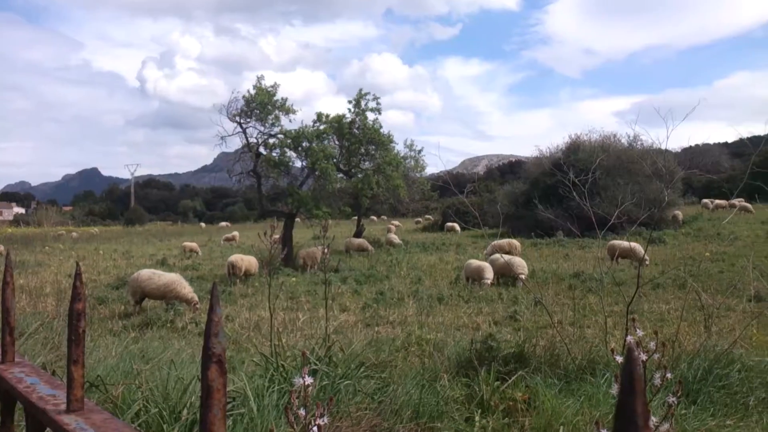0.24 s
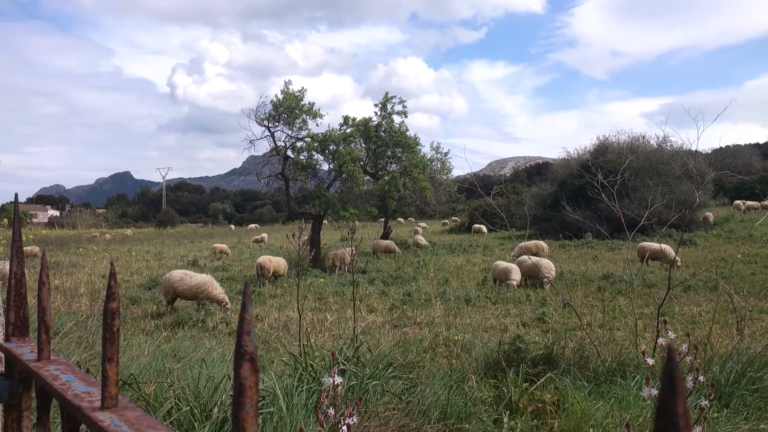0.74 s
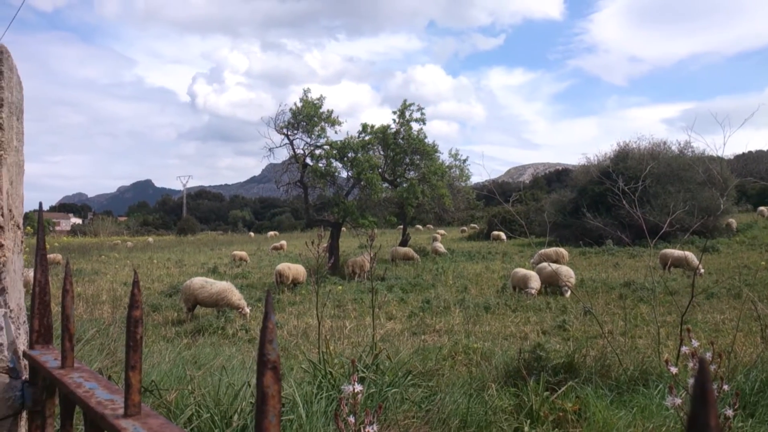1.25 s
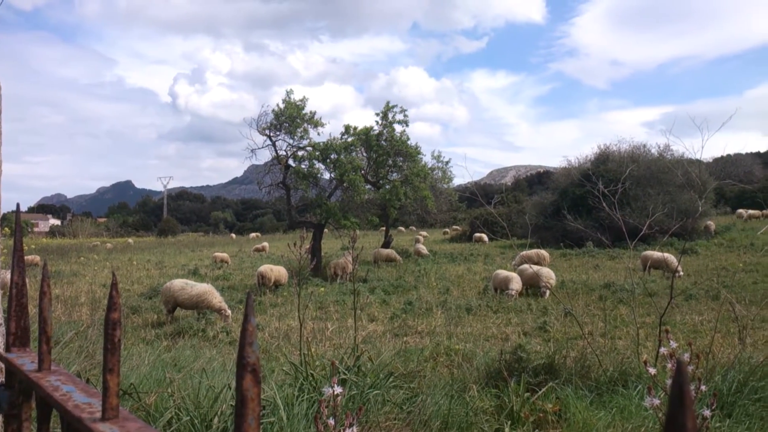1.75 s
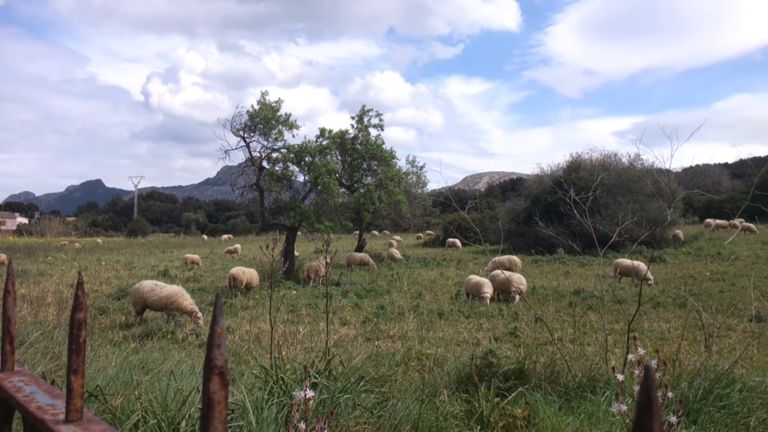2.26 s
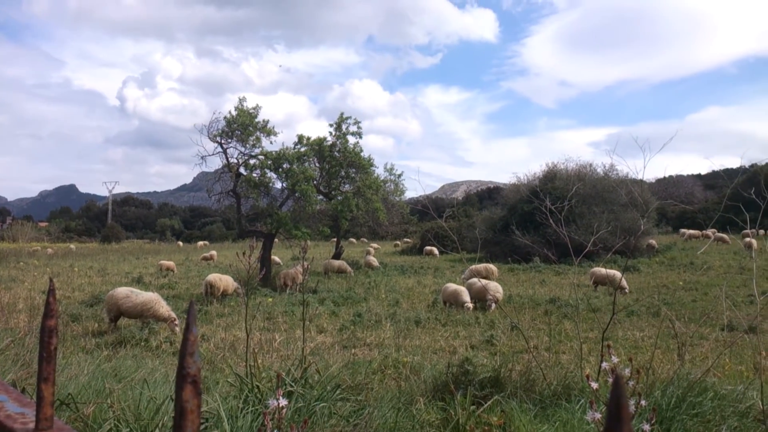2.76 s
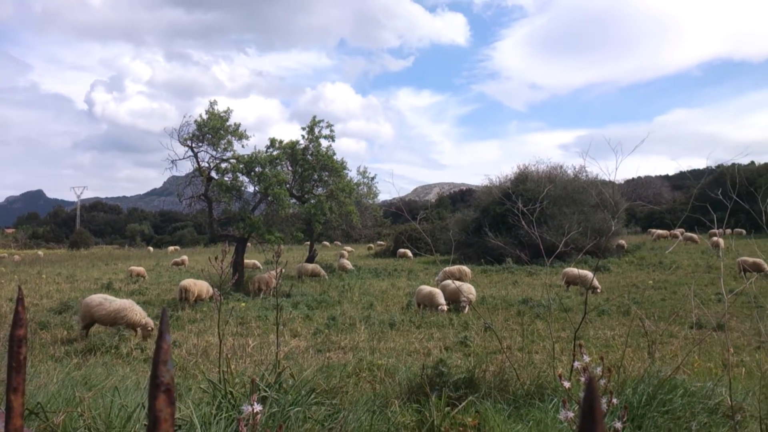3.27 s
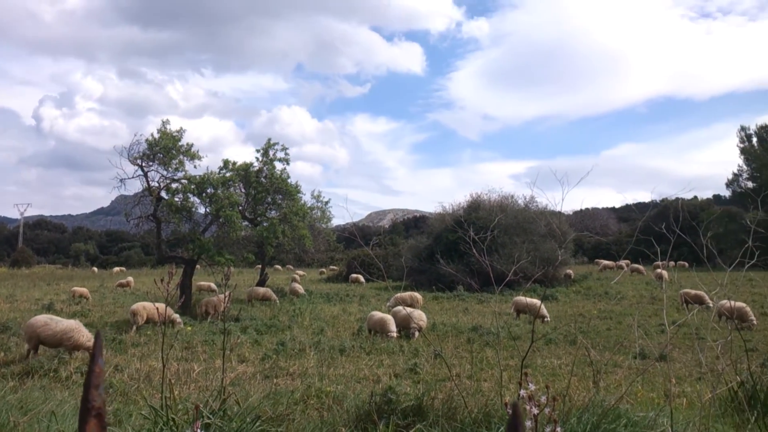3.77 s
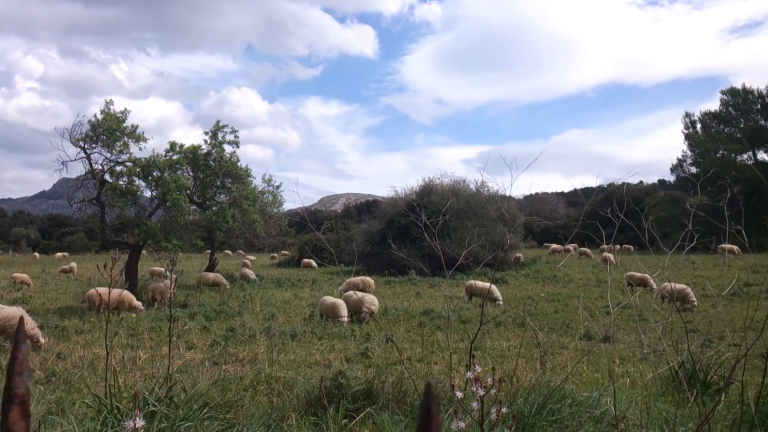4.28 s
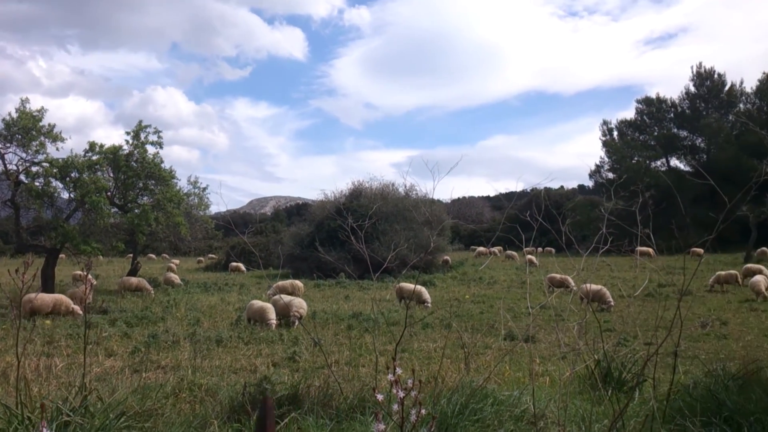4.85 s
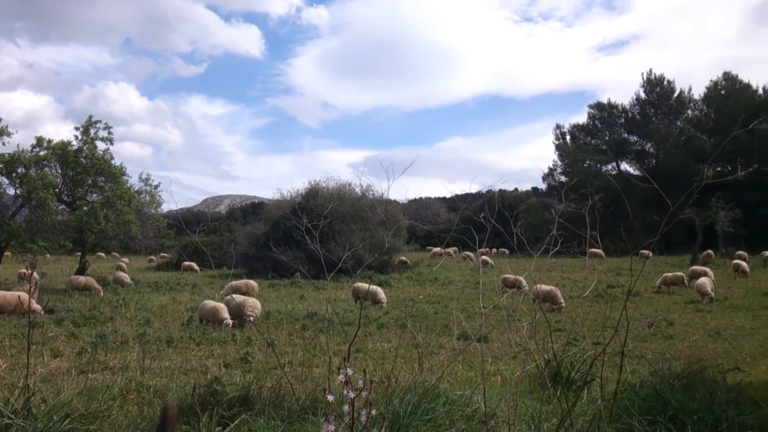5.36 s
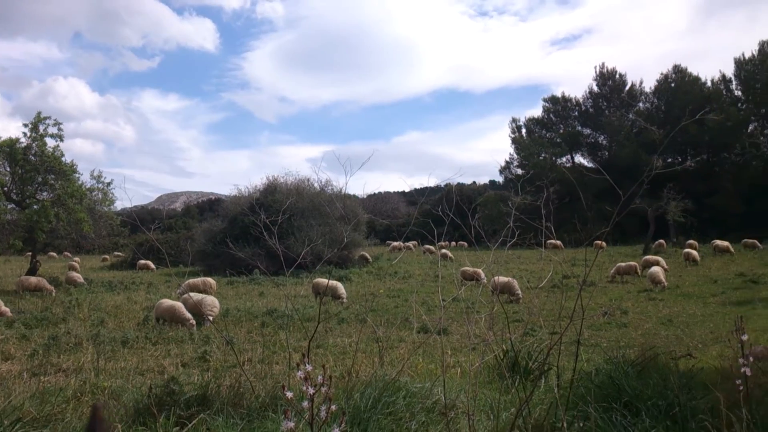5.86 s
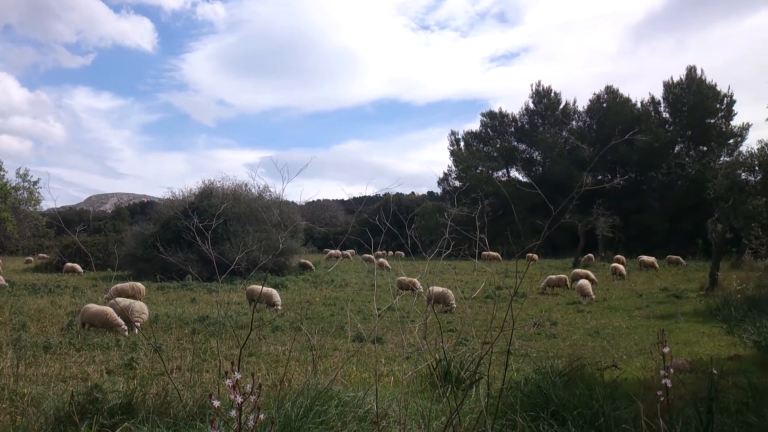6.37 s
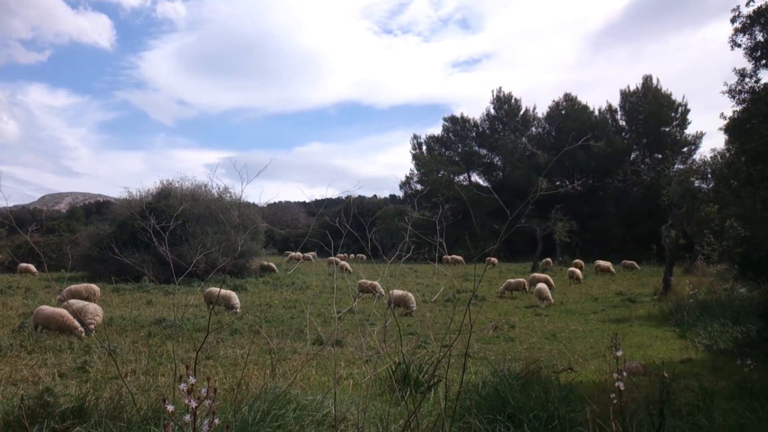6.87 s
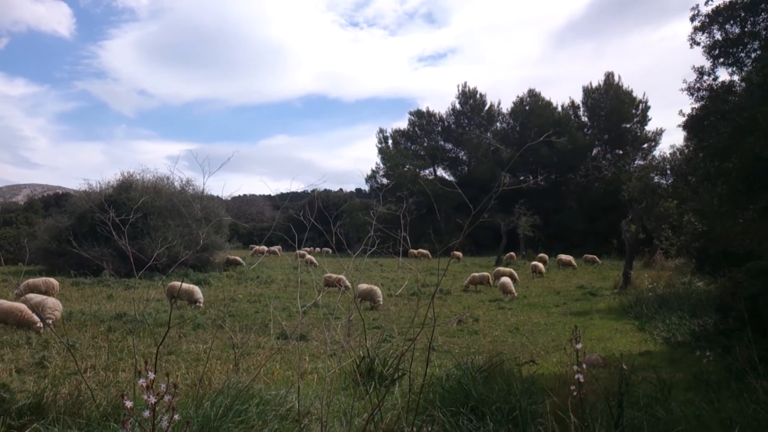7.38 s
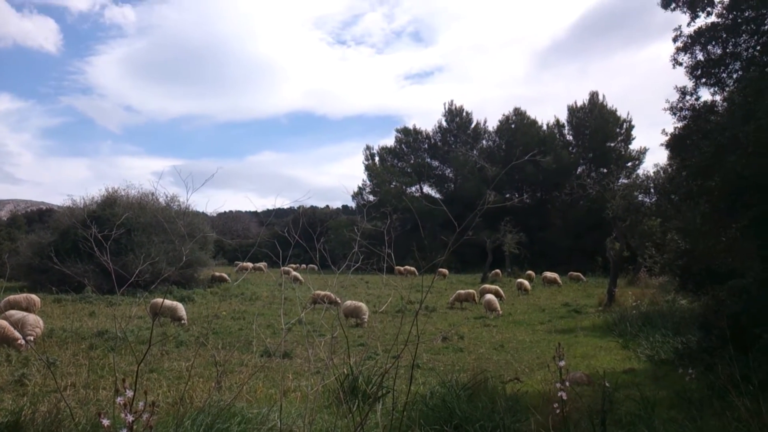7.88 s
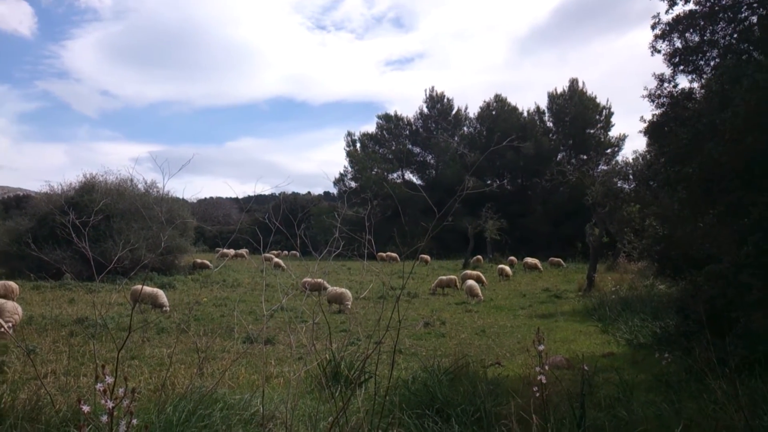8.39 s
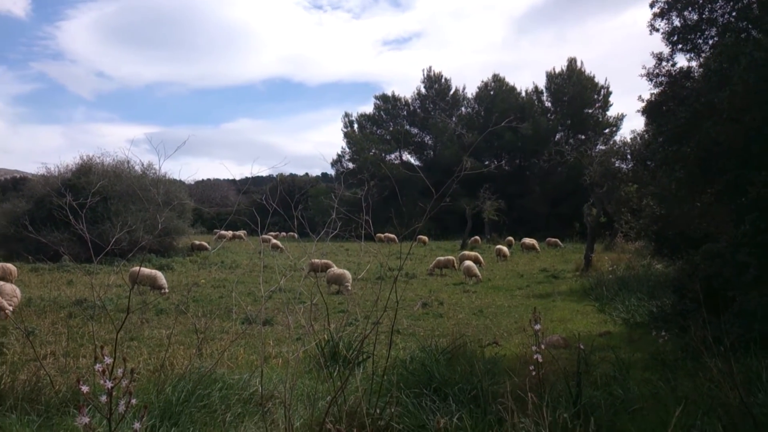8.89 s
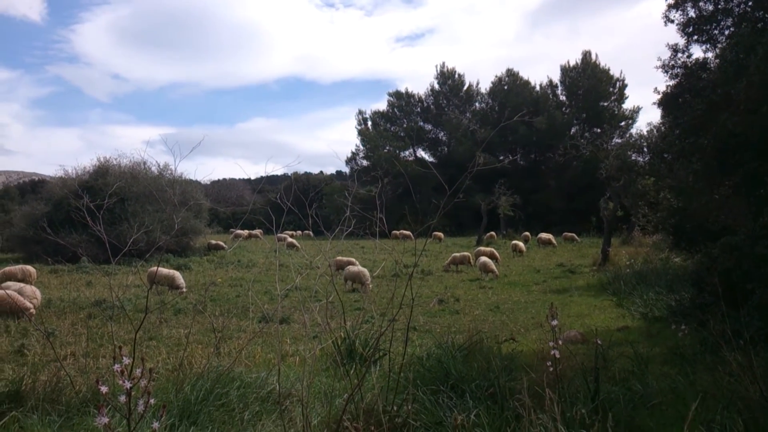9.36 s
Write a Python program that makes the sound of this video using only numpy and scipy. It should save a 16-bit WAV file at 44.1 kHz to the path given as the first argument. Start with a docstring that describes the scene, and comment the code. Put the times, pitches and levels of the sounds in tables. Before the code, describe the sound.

Grazing sheep's bells tinkle and clank near and far over soft outdoor wash, with wind rumble, faint triple bird hoots and a few dry cracks.

```python
"""After a short silence wind thumps and flutters at two microphone ports over the wash of a meadow: shaped noise.
The sheet-metal bells of a grazing flock clink as eighteen groups of modes, some of many and some of one, each
mode a decaying resonance; far bells jangle behind them. A hoopoe calls in threes with pure tones, three dry
cracks are noise bursts with an echo from the trees, and a far engine drones as a narrow band of low noise."""
import sys
import numpy as np
from scipy import signal
from scipy.fft import rfft, irfft, next_fast_len
from scipy.io import wavfile
from scipy.ndimage import map_coordinates

SR = 44100
rng = np.random.default_rng(int(sys.argv[2]) if len(sys.argv) > 2 else 0)


def master_out(mix):
    """Clip the mix to full scale and print it as 16-bit PCM to the path in sys.argv[1]."""
    frames = np.transpose(np.atleast_2d(mix))
    ceiling = np.clip(frames, -1, 1)
    pcm = np.round(ceiling * 32767).astype(np.int16)
    wavfile.write(sys.argv[1], SR, pcm)


N = 424683

# Likeness of the sound at the two ports. Each row: frequency in Hz, left-right correlation.
LIKENESS = [(60, -.05), (300, -.6), (1400, -.25), (5000, 0)]
# The ports face the flock unevenly. Each row: frequency in Hz, left-right level difference in dB.
PORT_BALANCE = [(300, -13.5), (1200, -9), (2300, -9), (4400, -3.5), (6500, 4), (8200, 6), (10000, -6.5),
                (14000, -10)]


def amp(db):
    """Level in decibels to amplitude ratio."""
    return 10 ** (np.asarray(db) / 20)


def unit(x):
    """Normalization to an rms of 1."""
    return x / np.sqrt(np.mean(x ** 2) + 1e-20)


def along(points, hz):
    """Linear interpolation of (Hz, value) points on a logarithmic frequency axis."""
    f, v = np.transpose(points)
    return np.interp(np.log(hz + 1), np.log(f + 1), v)


def curves(rows):
    """Linear interpolation in time: one value per sample for each column after the time."""
    seconds, *columns = np.transpose(rows)
    return [np.interp(np.arange(N) / SR, seconds, column) for column in columns]


def wobble(rate):
    """Slow random modulation: a smooth curve through normal random knots, rate knots a second."""
    knots = rng.standard_normal(int(N * rate / SR) + 4)
    return map_coordinates(knots, [np.arange(N) * rate / SR])


def filtered(x, response):
    """Linear filtering: the spectrum of x is multiplied by a response of frequency."""
    size = next_fast_len(x.shape[-1] + 8192)
    spectrum = rfft(x, size) * response(np.fft.rfftfreq(size, 1 / SR))
    return irfft(spectrum, size)[..., :x.shape[-1]]


def sides(db):
    """Constant-power panning: left and right gains for a left-right level difference."""
    return np.array([amp(db), np.ones_like(db)]) / np.sqrt(1 + amp(db) ** 2)


def rush(spectrum, alike, size=N):
    """Partly correlated stereo noise of rms 1: the mid and side shares set the left-right correlation."""
    def mid_side(hz):
        turn = np.arccos(np.clip(along(alike, hz), -1, 1)) / 2
        return amp(along(spectrum, hz)) * [np.cos(turn), np.sin(turn)]

    mid, side = filtered(rng.standard_normal((2, size)), mid_side)
    return unit(np.array([mid + side, mid - side]))


def gusts():
    """Transient pressure envelopes of thump and flutter: exponential rise, Gaussian fall."""
    # Separate buffets. Each row: start in seconds, relative thump level in dB, relative flutter level in dB.
    buffets = [(0.786, -44, -41.5), (0.909, -28, -27.5), (0.959, -16, -33.5), (1.034, -32, -26),
               (1.086, -25.5, -24.5), (1.113, -44, -34), (1.216, -28.5, -41), (2.599, -39, -50.5),
               (2.831, -23.5, -54), (3.019, -31.5, -46), (3.229, -30.5, -51), (3.324, -43, -35),
               (3.724, -30, -44), (3.983, -31.5, -40), (4.242, -30, -35.5), (4.45, -28, -38),
               (4.48, -35, -37), (6.017, -26.5, -71), (6.404, -31.5, -36)]
    rise_s, fall_s = 0.0036, [[0.039], [0.014]]  # the thump sinks slowly, the flutter fast
    t, out = np.arange(N) / SR, np.zeros((2, N))
    for start, *db in buffets:
        late = np.clip(t - start, 0, 10)
        rise = 1 - np.exp(-late / rise_s)
        fall = np.exp(-(late / fall_s) ** 2 / 2)
        out += amp(db)[:, None] * rise * fall
    return out


def wind():
    """Turbulent pressure at the ports: lumpy low noise, with a flutter above that grows faster than the breeze."""
    # Steady wind. Each row: time in seconds, relative level in dB.
    breeze = [(.8, -30), (1.15, -33), (1.75, -40.5), (2.6, -36.5), (3.2, -35.5), (3.5, -36), (5.4, -39.5),
              (6.3, -37.5), (6.7, -39), (9.6, -41.5)]
    # Spectrum of the low buffeting. Each row: frequency in Hz, relative level in dB per Hz.
    rumble = [(12, 4.5), (25, 7), (60, 0.5), (110, -12), (200, -31), (800, -110)]
    # Spectrum of the flutter. Each row: frequency in Hz, relative level in dB per Hz.
    flutter_spectrum = [(60, -14), (105, 0), (250, -12), (500, -30), (1200, -75)]
    breeze_db, = curves(breeze)
    thump, flap = gusts()
    lumps = np.array([wobble(11), wobble(11.5)]) + .7 * wobble(9)  # partly shared by the ports
    buffet = unit(amp(1.96 * lumps) * rush(rumble, [(30, 0.023)]))
    flutter = unit(amp(3.1 * lumps + 3.75 * wobble(21)) * rush(flutter_spectrum, [(100, -0.29)]))
    turning = sides(np.linspace(4, 9, N))  # the left port turns into the wind
    low = (amp(breeze_db) + thump) * buffet * turning
    flutter_gain = amp(-59.0 + 1.7 * (breeze_db + 39.5)) + amp(4.5) * flap
    return low + flutter_gain * sides(0.27)[:, None] * flutter


def meadow():
    """Diffuse background: the steady wash of air and far jangle as gently swelling shaped noise."""
    # Spectrum of the wash. Each row: frequency in Hz, relative level in dB per Hz.
    wash_spectrum = [(150, -38.5), (300, -18.5), (650, -15.5), (1000, -9), (2200, -21), (3000, -25.5),
                     (4300, -15.5), (8000, -38), (10000, -15), (15500, -86)]
    wash = filtered(rush(wash_spectrum, LIKENESS), lambda hz: sides(0.45 * along(PORT_BALANCE, hz)))
    return amp(-56.5) * amp(.8 * wobble(4)) * wash


def far_bells(count=40, size=18):
    """Modal superposition: each far bell has one mode in every family and is struck softly at random moments."""
    # Mode families. Each row: centre in Hz, spread as a share of it, relative level in dB, 60 dB decay in seconds.
    families = [(1003.5, 0.062, -52.5, 0.11), (2201, .15, -68, 0.32), (4336, 0.11, -62, 0.24),
                (5910, 0.21, -67, 0.084), (11200, 0.24, -62, 0.065)]
    out, t = np.zeros((2, N + SR // 5)), np.arange(SR // 5) / SR
    centre_hz, spread, db, t60 = np.transpose(families)[..., None]
    for place in rng.triangular(-1, 0, 1, (count, len(families), 1)):
        hz = centre_hz * (1 + spread * place)
        build_up = 1 - np.exp(-t * hz / 10)
        ring = amp(db - 60 * t / t60) * build_up * np.exp(2j * np.pi * hz * t)
        mode_hz = hz[:, 0]
        balance = sides(along(PORT_BALANCE, mode_hz))
        for when, strength, *luck in rng.random((size, 2 + len(families))):
            sign = np.sign(strength * size % 1 - .5)  # effectively random
            lead = np.arccos(along(LIKENESS, mode_hz)) * sign  # phase lead between the ports
            push = amp(6.05 * strength + 7.4 * np.array(luck)) * balance * np.exp([0j * lead, 1j * lead])
            out[:, int(when * N):][:, :len(t)] += (push @ ring).imag
    return out[:, :N]


def blows_on(clear, count=14):
    """Impact excitation: samples and strengths of the clear blows and of random light taps on one mode group."""
    tap_db, tap_spread_db = -20, 10  # taps lie 20 to 10 dB under the mean clear blow
    when, strength = rng.random((count, 2)).T
    seconds, db = np.transpose(clear)
    taps_db = db.mean() + tap_db + tap_spread_db * strength
    return np.r_[seconds * SR, when * N].astype(int), np.r_[db, taps_db]


def upper_modes(at, db, count=36):
    """Dense modal shimmer: every blow wakes the same short high modes of one group at new strengths."""
    level_db, typical_t60_s, range_hz = -6.5, 0.07, (4884, 15730)
    out, t = np.zeros((2, N + 3000)), np.arange(3000) / SR
    hz = rng.uniform(*range_hz, (count, 1))
    t60 = typical_t60_s * rng.uniform(0.27, 2.1, (count, 1))
    phase = 2 * np.pi * rng.random((2, count, 1))
    rings = sides(along(PORT_BALANCE, hz)) * amp(-60 * t / t60) * np.sin(2 * np.pi * hz * t + phase)
    luck_db = 4.1 * rng.standard_normal((len(at), count))
    for start, strength in zip(at, amp(db[:, None] + level_db + luck_db)):
        out[:, start:start + len(t)] += strength @ rings
    return out[:, :N]


def bells():
    """Modal resonance: each blow rings every mode of its group at a new strength; some groups also tick."""
    # Each line is one group of modes struck together: their frequencies in Hz.
    pitch_rows = [
        [1087, 4791, 5265, 11103, 11265, 13900, 15009],
        [4552],
        [2207, 4242, 5932, 6790, 10015],
        [4398, 6620, 9730, 13205],
        [3760, 4156, 5803, 6790, 10015],
        [4323, 5685],
        [2121, 4706, 5265],
        [4103],
        [826],
        [880],
        [922],
        [983, 1008],
        [1962],
        [2200],
        [4240],
        [1050],
        [3980],
        [2692],
    ]
    # Each line is one group, each entry one mode: relative level in dB, 60 dB decay time in seconds.
    mode_rows = [
        [(17.5, 0.052), (-3, 0.99), (-10, 0.28), (8.5, 0.092), (6, 0.1), (1, 0.11), (-2, 0.29)],
        [(20, 0.056)],
        [(4.5, 0.64), (12, 0.24), (0, 0.3), (-6, 0.42), (16, 0.083)],
        [(5, 0.25), (-7.5, 0.23), (13.5, 0.095), (10, 0.033)],
        [(4, 0.18), (10, 0.24), (3, 0.2), (0, 0.11), (12.5, 0.12)],
        [(12, 0.12), (-6, 0.12)],
        [(-3.5, 0.64), (12, 0.097), (-2.5, 0.39)],
        [(0, 0.74)],
        [(-5, 0.52)],
        [(-1, 0.51)],
        [(6, 0.58)],
        [(8.5, 0.18), (3, 0.29)],
        [(-1, 1)],
        [(2.5, 0.72)],
        [(7, 0.4)],
        [(13, 0.082)],
        [(13.5, 0.23)],
        [(4.5, 1)],
    ]
    # Each line is one group, each entry a clear clapper blow: time in seconds, relative level in dB.
    blow_rows = [
        [(1.458, -44.5), (3.399, -51), (1.843, -50.5), (3.497, -44.5), (3.838, -48), (4.231, -41.5),
         (4.627, -47), (4.964, -46), (5.635, -49.5), (8.327, -49.5), (9.118, -42.5)],
        [(3.021, -53), (4.272, -61), (4.985, -65), (6.781, -58), (7.288, -58), (7.505, -58), (9.121, -52)],
        [(1.192, -54.5), (4.122, -49), (6.6, -58), (7.512, -52.5), (7.94, -55), (9.267, -57)],
        [(0.9345, -49), (1.6245, -54.5), (2.162, -50.5), (2.29, -52), (2.614, -48), (2.96, -52), (4.86, -54.5),
         (6.27, -58), (6.87, -50), (7.337, -49), (7.925, -52.5), (8.77, -61), (9.36, -56.5)],
        [(4.556, -51.5), (4.998, -51), (5.233, -55), (5.437, -56.5), (5.719, -49.5), (6.805, -51.5),
         (8.88, -49), (9.267, -50.5)],
        [(4.88, -55), (5.46, -61), (5.82, -49.5), (6.81, -55.5), (8.115, -55), (8.52, -56.5), (9.267, -62),
         (9.489, -50.5), (9.57, -53.5)],
        [(1.594, -50.5), (2.089, -50), (4.215, -55), (4.33, -52.5), (6.434, -51), (6.63, -54), (6.812, -59.5)],
        [(2.831, -45), (3.774, -46.5), (4.33, -47.5), (6.434, -49.5)],
        [(1.325, -42.5), (3.63, -50), (3.812, -46.5), (6.802, -48), (8.65, -49.5), (9.438, -49.5)],
        [(2.285, -47.5), (4.84, -41), (5.172, -54.5), (5.71, -41.5), (9.565, -42)],
        [(1.018, -52.5), (3.12, -51), (3.86, -56), (4.72, -66), (5.637, -49)],
        [(0.938, -45), (1.94, -50), (2.08, -48.5), (2.63, -48), (2.826, -46.5), (3.257, -40.5), (6.43, -50),
         (6.503, -47), (9.047, -44)],
        [(6.43, -56), (6.68, -60.5), (6.952, -52.5), (8.44, -58)],
        [(6.347, -53), (6.77, -52.5), (7.288, -54.5)],
        [(2.09, -42), (3.29, -45), (6.898, -46)],
        [(3.2, -44), (4.79, -43.5)],
        [(1.594, -58.5), (3.228, -62), (4.29, -52.5)],
        [(3.497, -58), (8.327, -58.5)],
    ]
    ring, clack = np.zeros((2, N)), np.zeros(N)
    # a slow random wobble of level and phase roughens every mode
    roughness = amp(2.2 * wobble(18)) * np.exp(.4j * wobble(14))
    for pitches, modes, blows in zip(pitch_rows, mode_rows, blow_rows):
        at, db = blows_on(blows)
        if pitches[-1] > 4300:  # only groups with high modes tick and shimmer
            clack[at] += amp(db)
            ring += upper_modes(at, db)
        for hz, (mode_db, t60) in zip(pitches, modes):
            luck = rng.standard_normal((len(at), 4))  # strength, phase, sign of the lead, balance
            strength = amp(db + mode_db + 2.05 * luck[:, 0]) * np.exp(2j * luck[:, 1])
            balance = sides(along(PORT_BALANCE, hz) + 0.63 * luck[:, 3])
            # phase lead between the ports, set by their likeness, its sign random
            lead = np.arccos(along(LIKENESS, hz)) * np.sign(luck[:, 2])
            push = np.zeros((2, N), complex)
            push[:, at] = strength * balance * np.exp([0j * lead, 1j * lead])
            turn = np.exp(2j * np.pi * hz / SR)
            rise = np.exp(-hz / (7 * SR))  # the ring builds up over some cycles
            poles = np.poly([amp(-60 / (t60 * SR)) * turn, rise * turn])
            mode = signal.lfilter([1 - rise], poles, push)
            ring += (mode * np.roll(roughness, rng.integers(N))).real  # shifted anew for each mode
    t = np.arange(2000) / SR
    tick_envelope = signal.fftconvolve(clack, amp(-60 * t / .04))[:N]
    tick = tick_envelope * rush([(2500, -30), (4300, 0), (16000, -9)], LIKENESS)
    return ring + amp(3.5) * sides(-4.0)[:, None] * tick


def hoopoe():
    """Pure-tone phonation: three soft sine hoots a call, in opposite phase at the two ports."""
    # Each row: first hoot of a call in seconds, level in dB before panning, pitch in Hz.
    calls = [(3.089, -55, 658), (6.632, -54.5, 677), (8.812, -55.5, 673)]
    out, t = np.zeros(N + SR), np.arange(3600) / SR
    for start, db, hz in calls:
        hoot = amp(db) * np.hanning(len(t)) ** 0.31 * np.sin(2 * np.pi * hz * t)
        for k in range(3):
            out[round((start + .208 * k) * SR):][:len(t)] += hoot  # .208 s apart
    return out[:N] * sides(-9.0)[:, None] * [[-1], [1]]


def cracks():
    """Impulsive noise and scattering: a short burst, then a decaying diffuse echo from the tree line."""
    # Each row: time in seconds, relative level in dB, treble tilt in dB per octave (well above 1 kHz),
    # time in seconds for the burst to fall 15 dB, echo level in dB relative to the burst.
    shots = [(3.4752, -42.5, 7.5, 0.00087, -25.5), (5.758, -52, 4, 0.015, -17.5),
             (8.028, -39, 1.5, 0.0048, -28.5)]
    # Spectrum of a crack. Each row: frequency in Hz, relative level in dB per Hz.
    crack_spectrum = [(150, -22), (400, 7.5), (1100, 9.5), (2350, -8), (3200, -5.5), (6000, -22),
                      (15000, -28)]
    lead_in = .004  # seconds of room ahead of the burst
    out, t = np.zeros((2, N + SR)), np.arange(SR // 2) / SR
    for start, db, tilt_db, length, echo_db in shots:
        def colour(hz):
            level_db = along(crack_spectrum, hz) + tilt_db * np.log2(1 + hz / 1000)
            return amp(level_db) * sides(along(PORT_BALANCE, hz))

        late = np.clip(t - lead_in, 0, 1)
        direct = amp(-15 * (late / length) ** 2)
        echo = amp(echo_db - 60 * late / 1.02)
        noise = rush([(1, 0)], [(300, -1.63), (3000, 0.32)], size=len(t))
        burst = filtered((t > lead_in) * (direct + echo) * noise, colour)
        out[:, round((start - lead_in) * SR):][:, :len(t)] += amp(db + 19.0) * burst
    return out[:, :N]


def engine():
    """Band-limited noise: a far engine drones in a narrow low band with a wavering level."""
    # Each row: time in seconds, level in dB before the wavering.
    drone = [(6.5, -70), (8.3, -69.5), (9, -57), (9.63, -70)]
    band = rush([(170, -50), (210, -7.5), (260, -4.5), (300, -9.5), (400, -74)], LIKENESS)
    return amp(curves(drone)[0] + 3 * wobble(6)) * band


def scattered(flock):
    """Diffuse reflection: ground and trees scatter the bells, as convolution with decaying noise."""
    t = np.arange(SR // 3) / SR
    tail = rng.standard_normal((2, len(t))) * amp(-60 * t / 0.29) * (t > .008)
    return signal.fftconvolve(flock, tail / np.linalg.norm(tail[0]), axes=1)[:, :N]


def scene():
    """Linear superposition of all the sources at the ports."""
    flock = bells() + far_bells()
    return wind() + meadow() + flock + amp(-6) * scattered(flock) + hoopoe() + cracks() + engine()


def record(dry):
    """Self-noise and band limiting: microphone treble hiss, a top frequency, silence until the sound sets in."""
    start_s, top_hz = .777, 15750
    hiss = amp(-61) * rush([(6000, -30), (12000, -21)], LIKENESS) * sides(-8.0)[:, None]
    fade_in = np.clip((np.arange(N) / SR - start_s) * 200, 0, 1)  # over 5 ms
    return filtered(dry + hiss, lambda hz: hz < top_hz) * fade_in


dry = scene()
out = record(dry)
master_out(out)
```